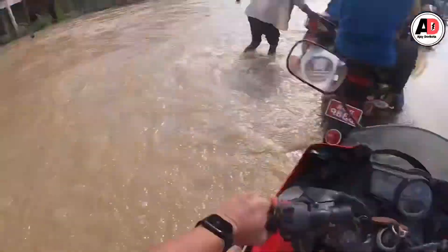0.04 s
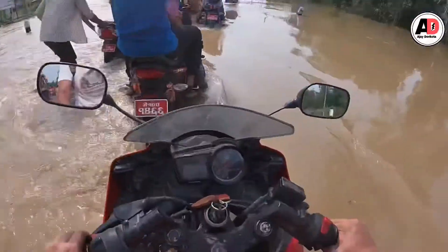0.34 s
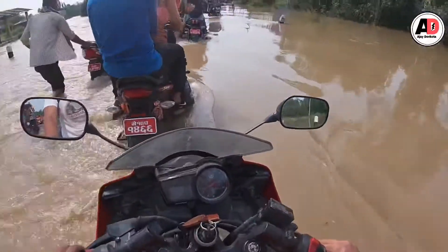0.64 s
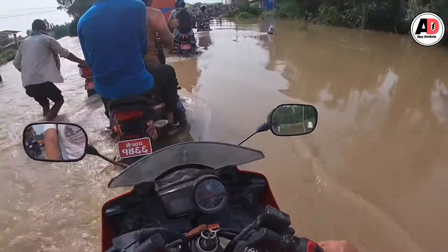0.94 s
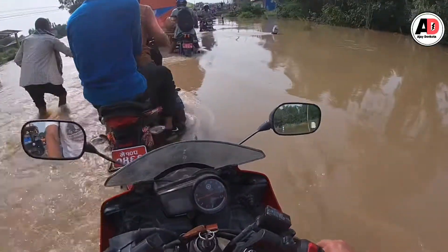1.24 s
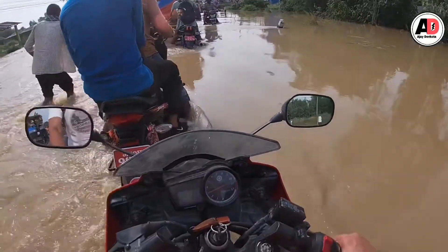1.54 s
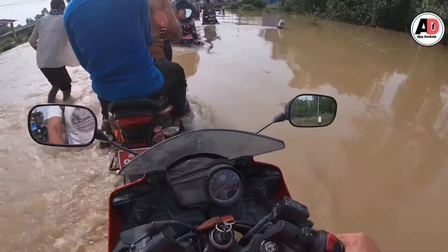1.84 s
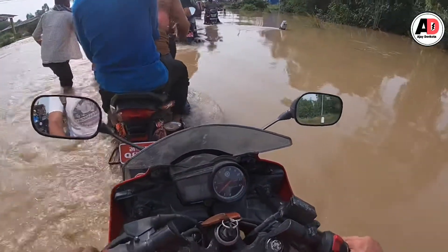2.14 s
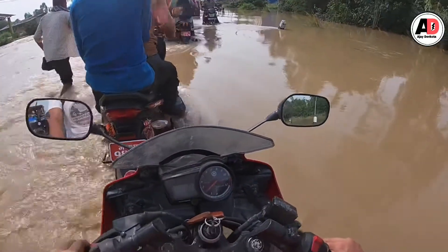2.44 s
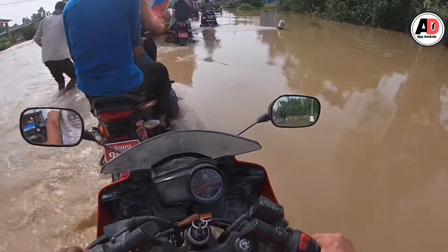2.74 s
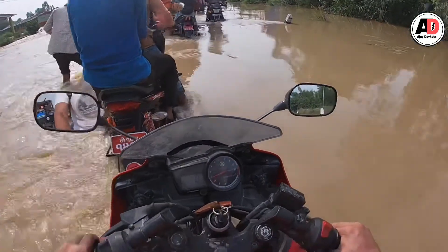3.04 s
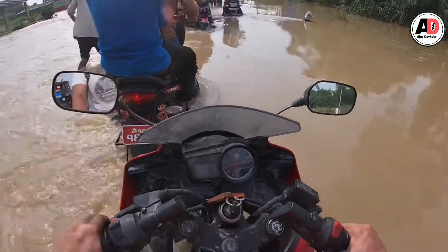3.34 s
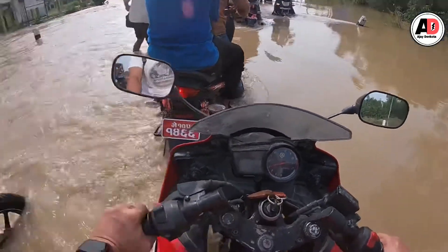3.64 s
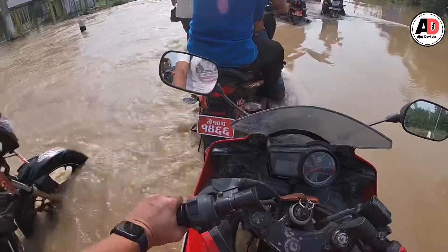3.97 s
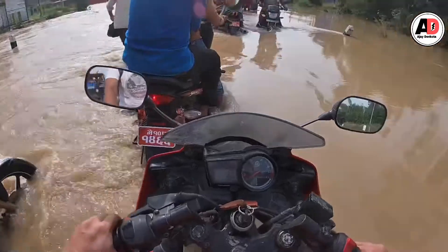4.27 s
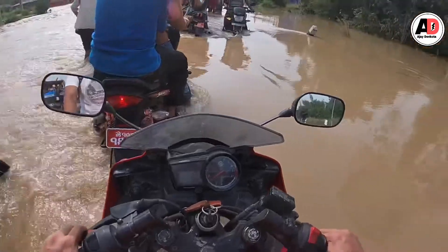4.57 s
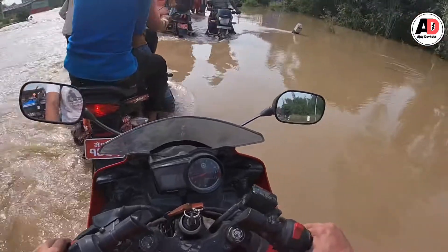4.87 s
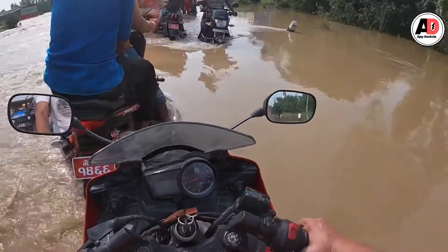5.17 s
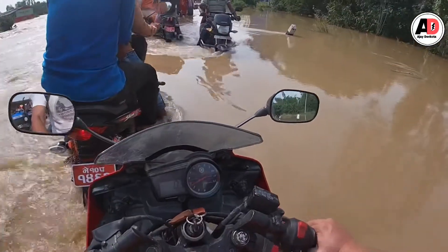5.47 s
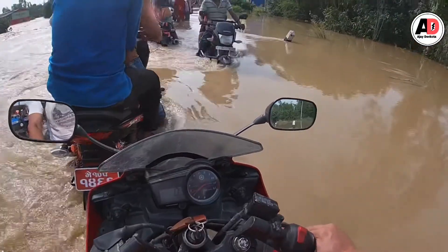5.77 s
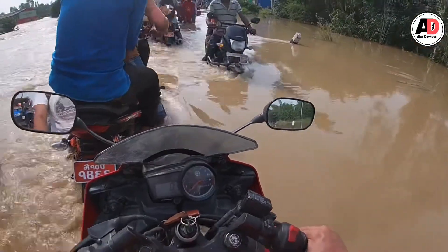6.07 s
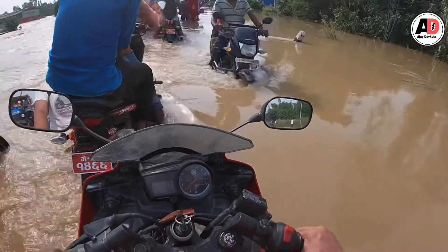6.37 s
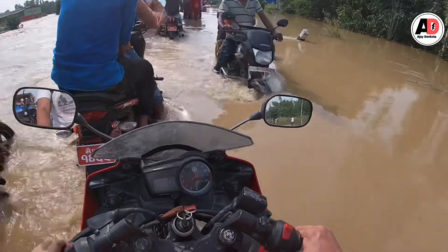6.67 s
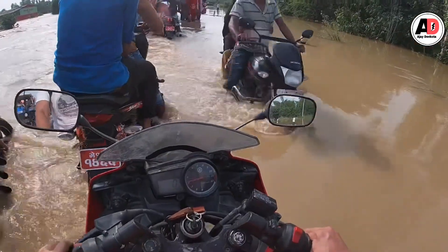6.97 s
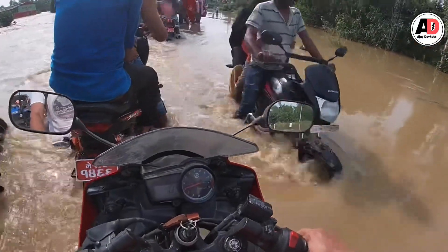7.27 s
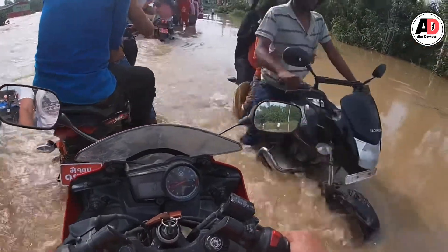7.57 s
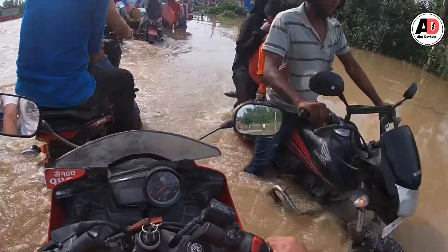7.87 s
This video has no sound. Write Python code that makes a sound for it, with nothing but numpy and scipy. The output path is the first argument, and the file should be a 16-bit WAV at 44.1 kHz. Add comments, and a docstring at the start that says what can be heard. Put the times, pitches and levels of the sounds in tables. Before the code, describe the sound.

Heard from the saddle of an idling motorcycle on a flooded road, the engine booms and clatters steadily. A bike just ahead blips its throttle again and again with a thumping exhaust, another revs alongside, and more burble farther off. Water sloshes, sprays and slaps throughout. Near the end an oncoming bike arrives with a splash and sounds a buzzing horn.

```python
"""Motorcycles queue through a flooded road, heard at one microphone on the saddle of an idling bike.
Just ahead a single cylinder blips its throttle again and again, its firings thumping through the
silencer; another revs alongside, and the rest of the queue burbles farther off. The engine under the
saddle booms and clatters. Wheels churn up slosh and spray, water slaps the bikes and gushes round
wading legs, and near the end an oncoming bike arrives with a splash and sounds its buzzing horn."""
import sys
import numpy as np
from scipy import signal
from scipy.fft import rfft, irfft, next_fast_len
from scipy.io import wavfile
from scipy.ndimage import uniform_filter1d

SR = 44100
rng = np.random.default_rng(int(sys.argv[2]) if len(sys.argv) > 2 else 0)


def inscribe(sig):
    """Save sig as 16-bit PCM at rate SR to the path in sys.argv[1].

    A 1-D sig is mono; a 2-D sig holds one channel per row.
    Samples are clipped to [-1, 1] before scaling.
    """
    pcm = np.round(np.clip(np.atleast_2d(sig).T, -1, 1) * 32767)
    wavfile.write(sys.argv[1], SR, pcm.astype(np.int16))


N = 348831
TIME = np.arange(N) / SR


def from_db(db):
    """Decibels to gain."""
    return 10 ** (np.asarray(db) / 20)


def rms_one(x):
    """Scale to unit power."""
    return x / np.sqrt(np.mean(x ** 2) + 1e-20)


def evened(x):
    """Hold the power near one over every few firings."""
    return x / np.sqrt(uniform_filter1d(uniform_filter1d(x * x, size=5000), size=4000) + 1e-12)


def in_time(rows):
    """Rows that open with a time in seconds become one curve for each further column."""
    seconds, *columns = np.transpose(rows)
    return [np.interp(TIME, seconds, column) for column in columns]


def drift(hz):
    """A random wander of unit power, mostly slower than hz."""
    step = 40
    pole = np.exp(-2 * np.pi * hz * step / SR)
    white = rng.standard_normal(N // step + 2002)
    slow = signal.lfilter([1], [1, -2 * pole, pole * pole], white)[2000:]
    return np.interp(np.arange(N) / step, np.arange(len(slow)), rms_one(slow))


def resonate(x, modes):
    """Parallel resonances of alternating sign. Each mode: centre in Hz, width in Hz, gain in dB."""
    out = 0
    for k, (hz, width, db) in enumerate(modes):
        r = np.exp(-np.pi * width / SR)
        ring = signal.lfilter([1, 0, -1], [1, -2 * r * np.cos(2 * np.pi * hz / SR), r * r], x + 1e-18)
        out += (-1) ** k * from_db(db) * (1 - r * r) / 2 * ring
    return out


def cut(x, hz, kind, order=2):
    """Butterworth low-, high- or band-pass."""
    return signal.sosfilt(signal.butter(order, hz, kind, fs=SR, output="sos"), x)


def coloured(spectrum, flicker_db):
    """Unit-power noise shaped by a spectrum, each half-octave band flickering by itself."""
    hz, db = np.transpose(spectrum)
    edges = 80 * 2 ** (np.arange(17) / 2)
    white, out = rng.standard_normal((2, N)), 0
    for k, (low, high) in enumerate(zip(edges, edges[1:])):
        flicker = from_db(flicker_db * drift(44))
        if high > hz[0] and low < hz[-1]:
            out += flicker * cut(white[k % 2], [low, high], "band", order=3)
    size = next_fast_len(N)
    bin_hz = np.maximum(np.fft.rfftfreq(size, 1 / SR), 1)
    shape = from_db(np.interp(np.log(bin_hz), np.log(hz), db))
    return rms_one(irfft(rfft(out, size) * shape, size)[:N])


def cycles(hz):
    """Running count of cycles at a changing rate."""
    return np.cumsum(hz) / SR


def puffs(turns, decay, depth):
    """An envelope that swells within a millisecond at each firing; decay is in cycles."""
    return rms_one(uniform_filter1d(1 + depth * np.exp(-(turns % 1) / decay), size=40))


def revving(blips, tickover_hz=19.0, throttle_lag_s=0.065):
    """Each blip winds the engine up and holds it; then the flywheel coasts towards tickover."""
    firing_hz, throttle = np.full(N, tickover_hz), np.zeros(N)
    for s, rise, hold, top_hz, fall, opening, *_ in blips:
        start = max(int(s * SR), 0)
        age = TIME[start:] - s
        driven_hz = np.interp(age, [0, rise], [firing_hz[start], top_hz])
        firing_hz[start:] = np.maximum(driven_hz - fall * np.maximum(age - rise - hold, 0), tickover_hz)
        throttle[start:] = opening * (age < rise + hold)
    levels = in_time([(s + rise, *db) for s, rise, hold, top_hz, fall, opening, *db in blips])
    return firing_hz, uniform_filter1d(throttle, size=int(throttle_lag_s * SR)), *levels


def exhaust_note(firing_hz, throttle, silencer_hz=123, width_hz=59):
    """Harmonics swell as they sweep through the silencer's resonance; the throttle shifts their mix."""
    # Each row: multiple of the firing rate, relative dB at open throttle, relative dB coasting.
    orders = [(1, 7.5, -1.5), (2, 4, -0.5), (3, -16.5, -1), (4, -1.5, 1), (5, 4, -6), (6, -1.5, -7),
              (7, -10, -4.5), (8, 2.5, -3.5)]
    turns, out = cycles(firing_hz), 0
    for k, open_db, coast_db in orders:
        silencer = 1 / (1 + (2 * (k * firing_hz - silencer_hz) / width_hz) ** 2)
        gain = silencer * from_db(throttle * open_db + (1 - throttle) * coast_db + 0.9 * drift(23))
        out -= gain * np.cos(2 * np.pi * k * turns + 0.14 * drift(10))
    return np.sqrt(2) * out


def bike_ahead(firing_hz, throttle, note_db, bark_db, rasp_db, gear_db):
    """Just ahead, a single cylinder thumps; its gears sing, and rising revs add bark, rasp and hiss."""
    # Header pipe resonances. Each row: centre in Hz, width in Hz, gain in dB.
    pipe_modes = [(205.6, 20, -1), (282.5, 22, 3), (311.5, 19, -3), (346, 20, -4.5), (452, 260, -18),
                  (555, 34, -9), (610, 85, -21)]
    # Valve gear under load, and the hiss above it. Each row: frequency in Hz, relative density in dB.
    rasp_spectrum = [(700,-16),(1060,4),(1200,0.5),(1450,3.5),(1750,-1.5),(2200,-3),(2700,-26),(4000,-23.5)]
    hiss_spectrum = [(5000,-2.5),(7000,-7.5),(8800,1.5),(10500,1),(11200,-13.5),(12500,-9.5),(14000,-24)]
    full_revs_hz, gear_teeth = 35, 30
    turns, extra_hz = cycles(firing_hz), firing_hz - full_revs_hz
    thump = exhaust_note(firing_hz, throttle) * from_db(note_db)
    firings = (np.diff(np.floor(turns), prepend=0) > 0) * from_db(3 * drift(25))   # uneven clicks
    gas = firings + 0.0079 * rng.standard_normal(N) * np.exp(-(turns % 1) / 0.2)
    bark = evened(cut(resonate(gas, pipe_modes), 700, "low", order=4))
    bark *= from_db(bark_db - 3 + extra_hz)   # 1 dB for each extra firing a second
    mesh = from_db(gear_db + 2.9 * drift(11)) * np.sin(2 * np.pi * gear_teeth * turns)
    gear = resonate(mesh, [(1040, 50, 0)])   # sings as it meets the gearbox's resonance
    rasp = coloured(hiss_spectrum, flicker_db=2.5) + from_db(20) * coloured(rasp_spectrum, flicker_db=1)
    rasp *= puffs(turns, decay=0.15, depth=0.36) * from_db(rasp_db - 1.7 + 0.6 * extra_hz)
    return thump + gear + bark + rasp


def idle_tones(turns, orders, waver_db):
    """Multiples of the firing rate, each wavering in strength."""
    out = 0
    for k, db in orders:
        out += from_db(db + waver_db * drift(5)) * np.sin(2 * np.pi * (k * turns + rng.random()))
    return np.sqrt(2) * out


def own_engine():
    """Under the microphone, the idle booms on its third harmonic; the casing hums and clatters."""
    # Idle speed. Each row: time in seconds, firings per second.
    idle_speed = [(0, 18.5), (2.1, 18.7), (2.8, 18.52), (5.7, 18.75), (7.9, 18.64)]
    # Tones of boom and casing. Each row: multiple of the firing rate, relative level in dB.
    boom_orders = [(2, -20), (3, -1), (4, -14), (6, -19.5), (7, -12.5)]
    casing_orders = [(9, -4.5), (12, 0.5), (13, -3.5), (14, -5.5), (15, -4), (17, -15), (25, -8), (31, -13),
                     (32, -14.5), (33, -13.5), (34, -16), (37, -15)]
    # How each swells and sinks. Each row: time in seconds, relative level in dB.
    boom_levels = [(0, -27), (.5, -28), (1.1, -26.5), (1.35, -27), (2.22, -25), (2.35, -27), (2.65, -26.5),
                   (2.95, -33), (3.3, -26), (3.8, -29.5), (4.1, -29.5), (4.6, -32), (4.9, -28), (5.45, -30),
                   (6.0, -27.5), (6.6, -31.5), (7.1, -29.5), (7.9, -31.5)]
    casing_levels = [(0, -46), (.9, -41), (2.1, -41.5), (3.5, -43.5), (4.2, -44.5), (7.9, -44)]
    # Colour of the clatter. Each row: frequency in Hz, relative density in dB.
    clatter_spectrum = [(150,-4),(230,1.5),(330,1.5),(450,1),(620,-7.5),(720,-11.5),(820,-13.5),(1100,-21.5),(1500,-23.5),(2500,-31.5),(5000,-37.5),(8000,-52)]
    firing_hz, = in_time(idle_speed)
    boom_db, = in_time(boom_levels)
    casing_db, = in_time(casing_levels)
    turns = cycles(firing_hz * (1 + 0.0012 * drift(6.5)))
    boom = from_db(boom_db - 6) * idle_tones(turns, boom_orders, waver_db=2)
    clatter = from_db(4.5) * coloured(clatter_spectrum, flicker_db=0.15)
    clatter *= puffs(turns, decay=0.11, depth=0.43) * puffs(4 * turns, decay=0.45, depth=0.57)
    whine, buzz = gear_whine(), metal_buzz(turns)
    hum = idle_tones(turns, casing_orders, waver_db=3)
    return boom + whine + buzz + from_db(casing_db) * (clatter + hum)


def gear_whine():
    """The idling bike's gears give one thin tone that comes and goes."""
    # Each row: time in seconds, pitch in Hz, relative level in dB.
    whine_curve = [(0, 476, -58), (.27, 476, -38.5), (.6, 474, -40.5), (1.05, 479, -38.5), (1.35, 477, -37),
                   (1.5, 475, -49), (2, 471, -38.5), (2.14, 472, -37), (2.27, 471, -49), (2.5, 464, -35.5),
                   (2.68, 468, -43.5), (2.82, 474, -40), (3.2, 476, -37.5), (3.68, 470, -39),
                   (3.9, 469, -55), (4.2, 469, -39), (4.6, 468, -43.5), (4.95, 469, -36.5),
                   (5.3, 467.8, -60), (6.1, 468, -39), (6.4, 468, -44.5), (6.65, 468.8, -34),
                   (6.95, 467.4, -48.5), (7.9, 467, -34)]
    hz, db = in_time(whine_curve)
    return np.sqrt(2) * from_db(db - 5 + 1.5 * drift(3.8)) * np.sin(2 * np.pi * cycles(hz))


def metal_buzz(turns):
    """Thin metal on the idling engine buzzes once a cycle."""
    # The metal's resonances. Each row: centre in Hz, width in Hz, relative gain in dB.
    metal_modes = [(5200, 270, 5.5), (8070, 130, 0.5), (10220, 170, -4.5)]
    # Strength of the buzz. Each row: time in seconds, level in dB.
    buzz_levels = [(0, -81), (1.0, -82), (3.5, -74), (4.3, -84.5), (7.9, -78)]
    db, = in_time(buzz_levels)
    shaking = rng.standard_normal(N) * puffs(turns, decay=0.25, depth=5)
    return from_db(db) * rms_one(resonate(shaking, metal_modes))


def bike_beside():
    """Another single revs alongside, a little farther off, heard by its exhaust note alone."""
    # Throttle blips. Each row: start, rise and hold in seconds, top firing rate in Hz,
    # fall in Hz per second, throttle opening from 0 to 1, gain of the note in dB.
    blips = [(-.1,0.088,.28,26.5,10.3,0.2,-34.5), (.3,.5,.15,33.6,16.2,0.75,-34.5),
             (1.9,.48,.2,37.5,14,0.2,-34), (3.85,0.31,.02,30,7,0.44,-39), (5.9,0.3,.1,31.4,5.23,0.39,-41)]
    firing_hz, throttle, note_db = revving(blips)
    return exhaust_note(firing_hz, throttle) * from_db(note_db)


def queue():
    """Many exhausts farther along the road blur into a burble over a deep rumble."""
    # Their resonances. Each row: centre in Hz, width in Hz, relative gain in dB.
    exhaust_modes = [(78.3, 37, -4), (100, 79, -10.5), (167, 46, -6)]
    # Strength of the burble. Each row: time in seconds, level in dB.
    burble_levels = [(0, -37), (1.2, -35.5), (1.8, -37.5), (2.7, -33), (3.4, -36), (5.7, -38.5),
                     (6.6, -37.5), (7.9, -36.5)]
    db, = in_time(burble_levels)
    rumble = from_db(-46) * rms_one(cut(rng.standard_normal(N), [24, 56], "band"))
    burble = cut(resonate(rng.standard_normal(N), exhaust_modes), [62, 260], "band", order=3)
    return rumble + from_db(db) * evened(burble)


def bubbles(per_s, low_hz, high_hz, q, spread_db, pitches=24):
    """Bubbles of many sizes come in clumps and ring briefly, the low ones loudest."""
    clumping = from_db(2.8 * drift(7))
    births = np.flatnonzero(rng.random(N) < per_s * clumping / SR)
    chance, sign, pitch = rng.random((len(births), 3)).T
    strength = from_db(spread_db * np.minimum(-np.log(chance), 4)) * np.sign(sign - 0.5)
    out = 0
    for k, hz in enumerate(np.geomspace(low_hz, high_hz, pitches)):
        clicks = np.bincount(births, strength * ((pitch * pitches).astype(int) == k), N)
        out += resonate(clicks, [(hz, hz / q, 0)]) * (low_hz / hz) ** 1.7
    return rms_one(cut(out, 6000, "low", order=6))


def churned_water(firing_hz, cruise_hz=34):
    """Wheels churn up slosh and bubbles; the exhaust ahead beats the spray into pulses."""
    # The water at cruising revs. Each row: time in seconds, gain of slosh and of spray in dB.
    water_levels = [(0, -47.5, -59), (.9, -44.5, -60.5), (1.5, -45.5, -60.5), (2.1, -48, -61.5),
                    (2.8, -43.5, -58.5), (3.5, -46.5, -61), (4.6, -51, -60.5), (5.1, -47, -60.5),
                    (5.55, -57, -66), (6.0, -51, -63), (6.55, -48, -59), (7.1, -50, -64.5),
                    (7.55, -47.5, -60)]
    # Colours of slosh and spray. Each row: frequency in Hz, relative density in dB.
    slosh_spectrum = [(200,-13),(400,13.5),(620,-22.5),(800,-2),(1100,9),(1450,4.5),(1800,-2),(2300,-0.5),(2800,-21.5),(4000,-39.5)]
    spray_spectrum = [(1800,-10),(2600,1.5),(3300,1),(4100,-6),(5400,-4.5),(6000,-9),(6800,-17),(8500,-21),(10300,-27.5),(11300,-28.5),(14000,-33.5)]
    slosh_db, spray_db = in_time(water_levels)
    churn = from_db(0.09 * (firing_hz - cruise_hz))   # a faster wheel ahead throws more water
    slosh = from_db(-3.5) * coloured(slosh_spectrum, flicker_db=1)
    gurgle = from_db(-9.5) * cut(bubbles(260, 700, 2600, q=49, spread_db=4), 2600, "low")
    spray = coloured(spray_spectrum, flicker_db=1.5) * puffs(cycles(firing_hz), decay=0.3, depth=0.89)
    droplets = from_db(-9) * bubbles(600, 2400, 5800, q=16, spread_db=1.5)
    return churn * (from_db(slosh_db) * (slosh + gurgle) + from_db(spray_db) * (spray + droplets))


def water_slaps(attack_s=0.002, decay_s=0.007):
    """Water slaps against the bikes and bursts into a short bright spit."""
    # Each row: start in seconds, relative level in dB.
    slaps = [(0.0294, -53), (0.3094, -54), (0.4994, -56), (0.5605, -53), (0.597, -50), (0.6668, -50),
             (0.772, -50), (1.2365, -47), (1.356, -47), (1.5248, -48), (1.5943, -47), (1.7029, -51),
             (1.7404, -48), (1.7794, -52), (1.9204, -48), (2.4137, -51), (2.6623, -55), (2.774, -46),
             (2.9374, -48), (3.143, -50), (3.4793, -52), (3.7388, -53), (4.1319, -48), (5.0695, -53),
             (7.4264, -51)]
    # Colour of the spit. Each row: frequency in Hz, relative density in dB.
    spit_spectrum = [(900, -10), (1800, -1.5), (3400, 6), (5500, 8), (7000, -12), (10000, -22),
                     (11500, -30.5)]
    envelope = np.zeros(N)
    for start, db in slaps:
        age = np.maximum(TIME - start, 0)
        envelope += from_db(db - 5.5) * np.minimum(age / attack_s, 1) * np.exp(-age / decay_s)
    return envelope * coloured(spit_spectrum, flicker_db=0.5)


def gushes():
    """Sheets of water from wading legs, later from the oncoming bow wave, gush in narrow bands."""
    # Each row: time of the peak in seconds, centre and width in Hz, spread in seconds, level in dB.
    splashes = [(0.062, 4870, 400, .08, -68), (.3, 3200, 800, 0.15, -65), (.85, 2960, 700, 0.23, -61),
                (1.75, 5564, 1000, .1, -70), (2.969, 1355, 220, 0.064, -54), (6.504, 1240, 111, 0.036, -65),
                (7.45, 1160, 130, 0.045, -51.5), (7.521, 4516, 1390, 0.14, -64.5),
                (7.594, 1241, 200.3, 0.066, -50.5), (7.58, 3860, 900, 0.033, -59),
                (7.6, 3700, 300, 0.0079, -52), (7.72, 1603, 300, 0.048, -68), (7.825, 1130, 220, .05, -49)]
    out = 0
    for peak_s, hz, width, spread_s, db in splashes:
        gush = rms_one(cut(rng.standard_normal(N), [hz - width / 2, hz + width / 2], "band"))
        out += gush * from_db(db) * np.exp(-0.5 * ((TIME - peak_s) / spread_s) ** 2)
    return out


def horn(start_s=7.653, pitch_hz=476.9, attack_s=0.011):
    """A diaphragm buzzes; its echo off the water shifts as the bike nears, so partials swell and fade."""
    # Each row: multiple of the pitch, relative level in dB.
    partials = [(1,2.5),(2,-12.5),(3,-9.5),(4,-15),(5,-19.5),(6,-23.5),(7,-22.5),(8,-27),(9,-29.5),(10,-30),(11,-30.5),(12,-31.5),(13,-37),(14,-40),(15,-43),(16,-48),(17,-57)]
    age = np.maximum(TIME - start_s, 0)
    hz = pitch_hz - 4.1 * np.exp(-age / 0.013)   # starts flat and pulls up to pitch
    turns = cycles(hz * (1 + 0.00209 * drift(38)))
    echo_lag_s = 0.00123 + 0.00315 * age
    out = 0
    for k, db in partials:
        phase = 2 * np.pi * (k * turns + rng.random())
        bounce = 0.65 * (1 - 1 / k ** 2)   # the horn beams its overtones at the water
        echo = bounce * np.sin(phase - 2 * np.pi * k * hz * echo_lag_s)
        out += from_db(db + 0.49 * drift(9.4)) * (np.sin(phase) + echo)
    return np.sqrt(2) * from_db(-35.5) * np.minimum(age / attack_s, 1) * out


def scene():
    """The flooded road in the open air, in mono from the saddle."""
    # Throttle blips of the bike ahead. Each row: start, rise and hold in seconds, top firing rate in Hz,
    # fall in Hz per second, opening from 0 to 1, then relative dB of note, bark, rasp and gears.
    blips_ahead = [(-.09,.11,0.28,34,32.4,0.6,-34.5,-38,-76,-59),
                   (.53,0.34,0.031,30.8,14,0.5,-33.5,-34.5,-81,-56.5),
                   (1.38,0.86,.02,36.3,15.5,0.27,-33.5,-41,-79,-57.5),
                   (2.72,0.56,.33,34.2,46.5,.45,-30.5,-29.5,-71.5,-52.5),
                   (3.86,.42,0.021,36.8,18.8,0.62,-29.5,-32,-71,-63),
                   (4.83,.4,0.021,37.2,32.7,0.53,-27.5,-35.5,-69,-67),
                   (5.6,.41,.02,35,45,0.21,-31,-44,-75.5,-62),
                   (6.31,0.29,0.027,33,27.4,1,-28.5,-36.5,-74,-62.5),
                   (7.02,0.27,0.021,32.6,29.7,.85,-28.5,-33.5,-75.5,-59.5),
                   (7.54,0.37,0.011,33.4,28.2,0.53,-29,-43.5,-72.5,-65)]
    firing_hz, throttle, *levels = revving(blips_ahead)
    engines = own_engine() + bike_ahead(firing_hz, throttle, *levels) + bike_beside() + queue()
    water = churned_water(firing_hz) + gushes() + water_slaps()
    fade_in = np.minimum(TIME / 0.004, 1)
    return ((engines + water + horn()) * fade_in)[None]


def record(dry, saturation=0.21):
    """The microphone sheds the deepest rumble, rounds the peaks and loses the highest treble."""
    rounded = saturation * np.tanh(cut(dry, 11, "high") / saturation)
    return cut(from_db(1) * rounded, 13800, "low", order=14)


dry = scene()
out = record(dry)
inscribe(out)
```